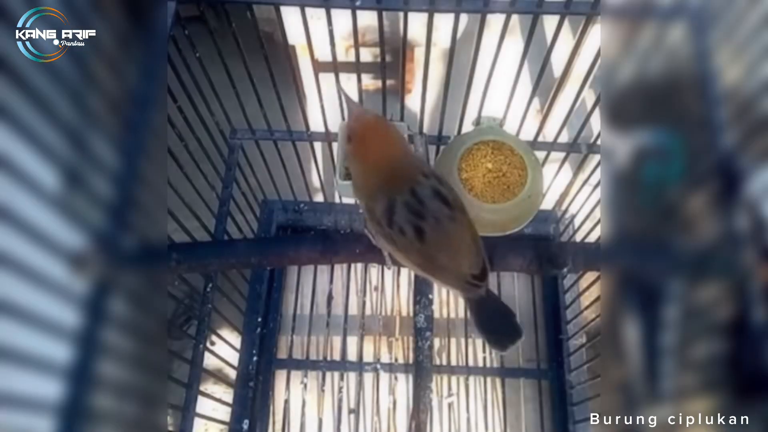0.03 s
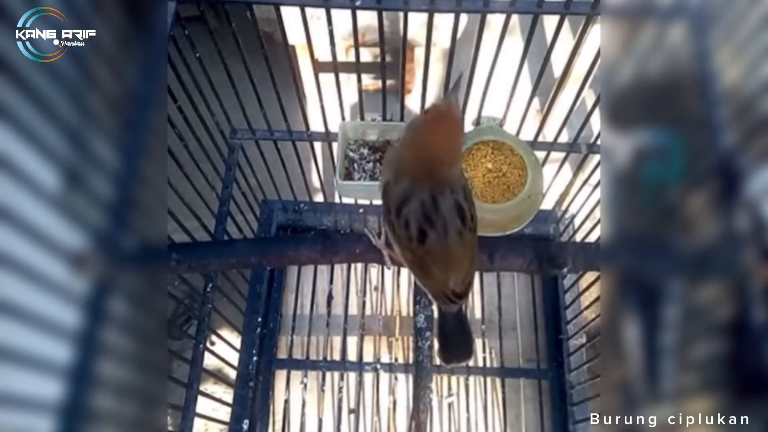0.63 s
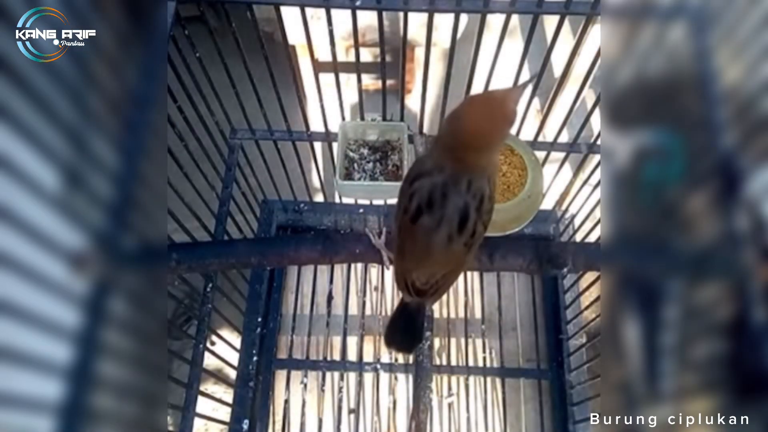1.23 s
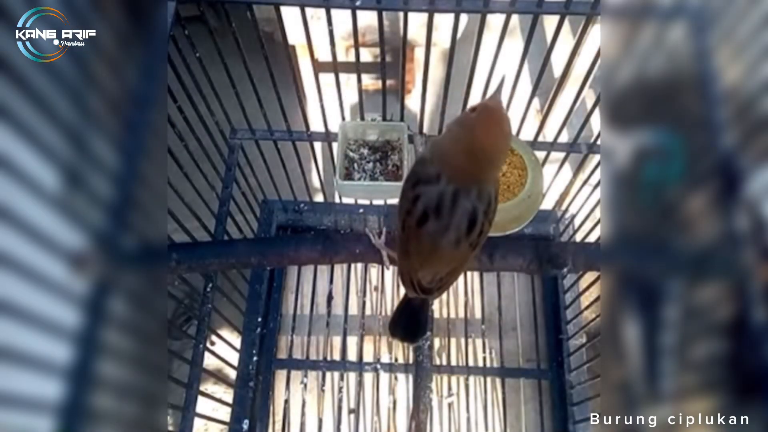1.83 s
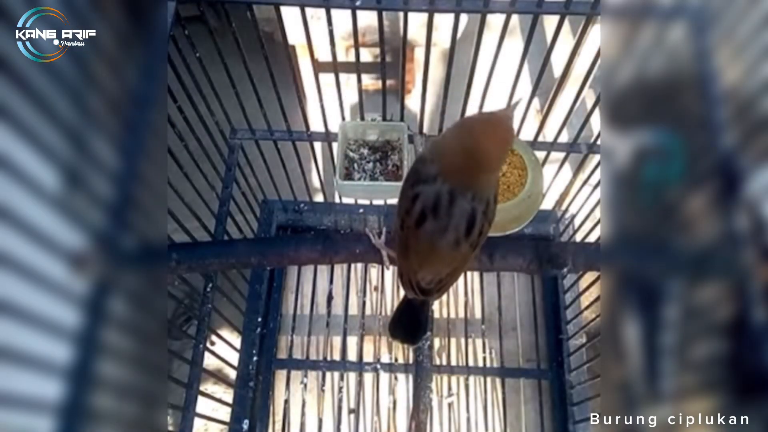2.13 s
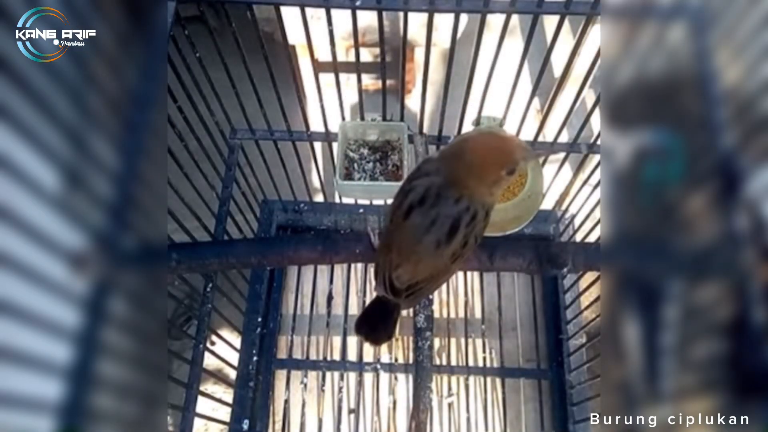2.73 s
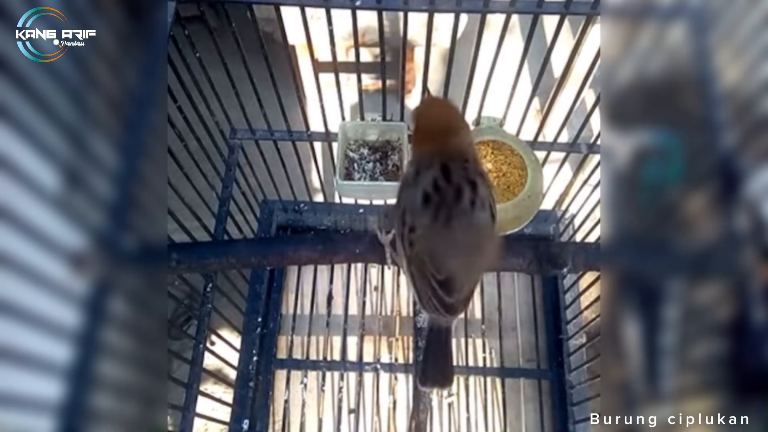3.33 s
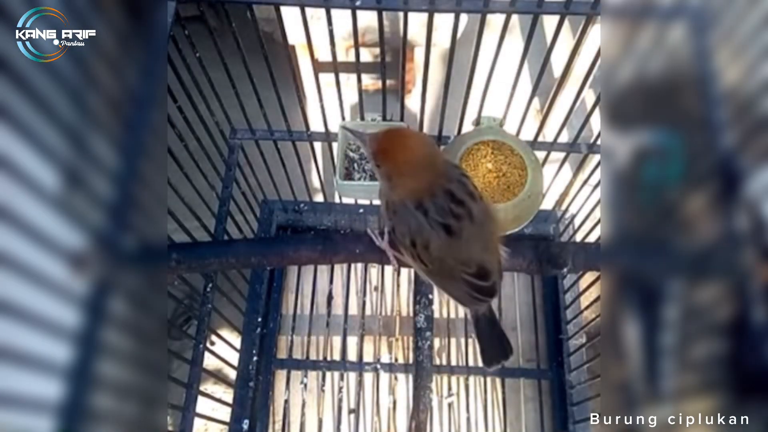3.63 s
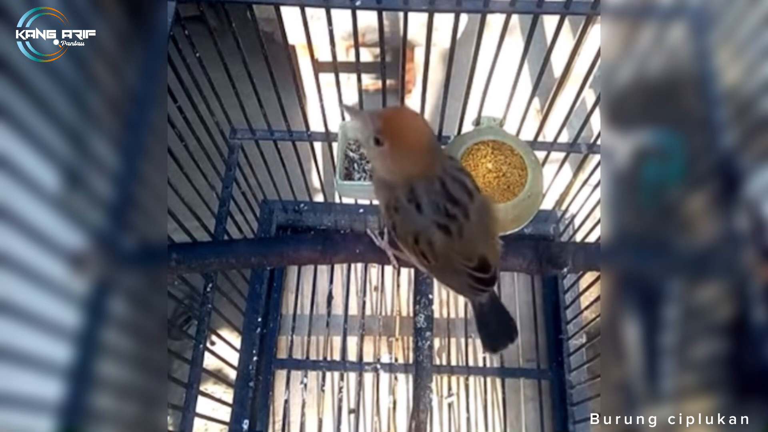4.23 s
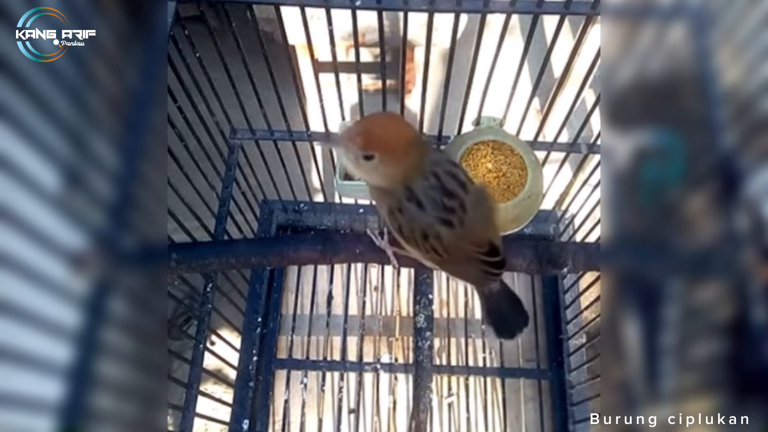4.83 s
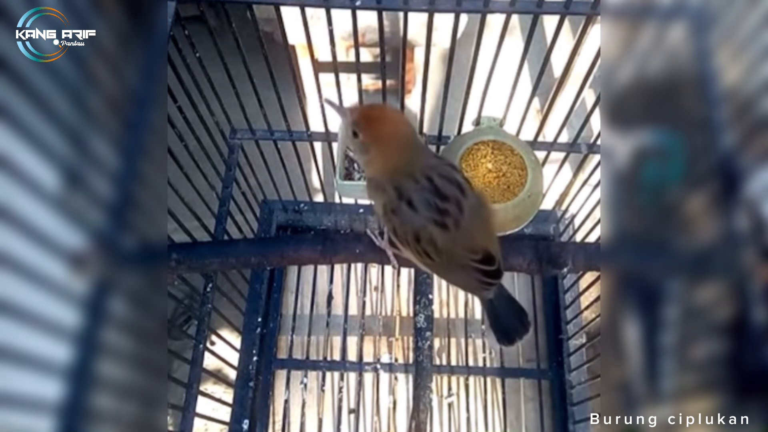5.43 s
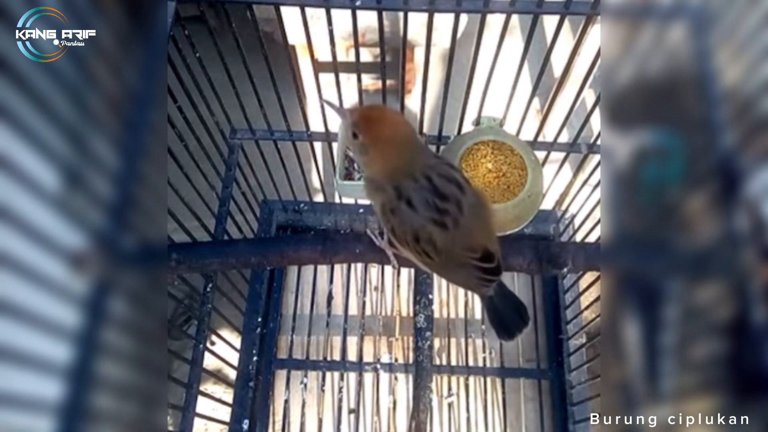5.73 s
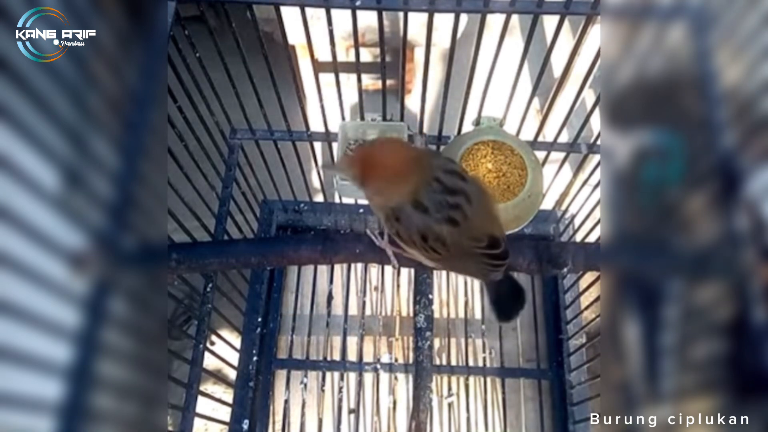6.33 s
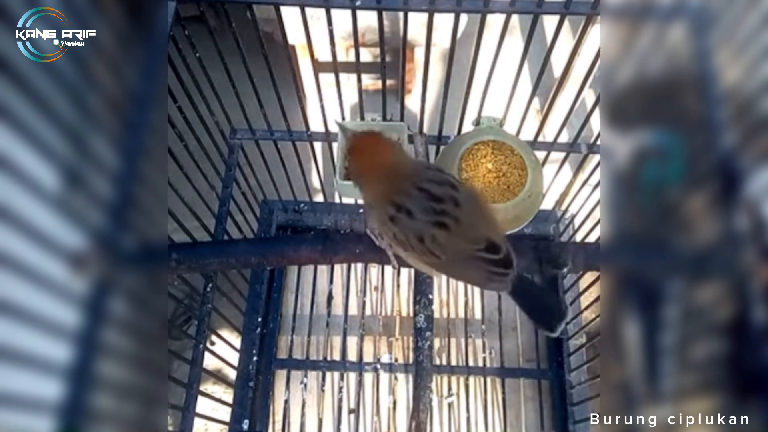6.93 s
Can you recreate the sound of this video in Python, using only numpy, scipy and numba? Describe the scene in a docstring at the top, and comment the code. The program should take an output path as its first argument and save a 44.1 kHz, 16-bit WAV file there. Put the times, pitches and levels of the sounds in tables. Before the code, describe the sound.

Close by, a small songbird chirps sharply in two bursts, hops once, then whines and rasps against a low, steady indoor hum.

```python
"""A caged songbird

Close by, the syrinx of a small bird sounds two runs of loud up-slurred chirps, soft peeps and low churrs.
Its pulses, filtered by throat and beak, give a harsh buzz and nasal whines that break into a rasp.
The bird hops round once on its perch, and its wire cage adds brief reflections. Fainter whistles come
from further off; a short room tail and a steady rumble, motor hum and hiss lie behind."""
import sys
import numpy as np
from scipy import signal
from scipy.fft import rfft, irfft, next_fast_len
from scipy.io import wavfile
from scipy.ndimage import uniform_filter1d, minimum_filter1d
from numba import njit

SR = 44100
rng = np.random.default_rng(int(sys.argv[2]) if len(sys.argv) > 2 else 0)


def master(y):
    """Save y as 16-bit WAV."""
    cut = np.clip(np.atleast_2d(y).T, -1, 1)
    pcm = np.round(cut * 32767)  # scale
    wavfile.write(sys.argv[1], SR, pcm.astype(np.int16))


N = 307818
T = np.arange(N) / SR

# Chirps: start t/s, lock into a tone t/s, end t/s, last puff f/Hz, crest f/Hz, end f/Hz,
# stutter level/dB, tone level/dB, fade of the tone/dB, warble strength (0-1)
CHIRPS = [(0.073, 0.109, .178, 2483, 3362, 3052, -18, -11.5, 9, .2),
          (0.348, 0.38, .446, 2900, 3540, 3240, -12, -9.5, 8, 0.66),
          (.616, .649, .711, 3067, 3642, 3280, -10.5, -10, 2, 0.1),
          (0.896, 0.93, .99, 3386, 3727, 3513, -12, -7, 7.5, 0.93),
          (1.131, 1.168, 1.229, 3403, 3813, 3490, -6.5, -9, 6, .1),
          (3.905, 3.938, 4.011, 2500, 3164, 3290, -13.5, -12, 7, .4),
          (4.173, 4.206, 4.274, 2910, 3708, 3285, -12, -8, 9.5, 0.24),
          (4.413, 4.44, 4.495, 3120, 3647, 3590, -14.5, -11, 18.5, 0.97),
          (4.632, 4.667, 4.731, 3294, 3630, 3407, -16, -14, 7.5, .2),
          (4.876, 4.911, 4.975, 3204, 3782, 3370, -10, -9.5, 11, 0.65),
          (5.108, 5.137, 5.211, 3180, 3686, 3214, -10, -13.5, 4, 0.2),
          (5.364, 5.398, 5.464, 3180, 3723, 3390, -12, -6.5, 21.5, 0.56)]
# Partials of a chirp: multiple of the loud line (the second harmonic of the syrinx), relative level/dB
CHIRP_PARTIALS = [(.5, -35.5), (1, 0.5), (1.5, -34.5), (2, -33.5), (2.5, -47), (3, -37), (3.5, -55.5),
                  (4, -43.5)]
# Spectrum of air rushing through the beak: f/Hz, relative level/dB
BREATH_SPECTRUM = [(700, -26.5), (1600, 1.5), (4000, -2), (7000, -2), (10000, 1), (13000, -2),
                   (15500, -4.5)]


def chirps(first_hz=1880, first_db=-28, puff_s=.0074, sag_db=18, bright_db=8, crest_at=.3,
           warble_hz=84.9, warble_depth=.02, warble_db=2, side_gap_hz=800):
    """Self-sustained oscillation: the syrinx stutters upward in puffs, then locks into an arched tone."""
    out = np.zeros(N)
    for start, lock, end, last_hz, crest_hz, end_hz, last_db, level_db, fade_db, warble in CHIRPS:
        t = span(start, end)
        rising = t < lock
        climb = (t - t[0]) / (lock - t[0])
        held = np.clip((t - lock) / (end - lock), 0, 1)
        puffs = max(round((lock - start) / puff_s), 2)
        puff, age = np.divmod(climb * puffs, 1)
        stair_hz = first_hz + (last_hz - first_hz) * (puff / (puffs - 1)) ** .85
        arch_hz = np.interp(held, [0, crest_at, 1], [.94 * crest_hz, crest_hz, end_hz])
        near_crest = np.exp(-((held - crest_at) / .44) ** 2)
        shake = warble * near_crest * np.sin(2 * np.pi * warble_hz * t + wander(t, 40))
        hz = uniform_filter1d(np.where(rising, stair_hz, arch_hz * (1 + warble_depth * shake)), size=25)
        waver = np.where(rising, .02, .0075) * wander(t, 350) + .006 * wander(t, 90)
        phase = phase_of(hz * (1 + waver))
        # early puffs die away before the next one; later ones merge
        stutter_db = np.interp(climb, [0, .66, 1], [first_db, last_db - 2.5, last_db])
        stutter_db -= sag_db * (age - .5) * (1 - puff / puffs)
        tone_db = level_db - fade_db * held ** 1.54 + warble_db * shake + gate_db(t, 1 / SR, .0045)
        db = np.where(rising, stutter_db, tone_db) + 1.4 * wander(t, 130)
        # the membranes beat unevenly, most of all before they lock
        unrest = np.where(rising, .055, .01)
        phase += unrest * wander(t, 2200)
        envelope = uniform_filter1d(undb(db), size=40) * (1 + unrest * wander(t, 2200))
        voice = noise(BREATH_SPECTRUM, len(t)) * undb(np.where(rising, -34, -42))
        for k, partial_db in CHIRP_PARTIALS:
            flicker_db = 4 * (k != 1) * wander(t, 129.4)
            voice += undb(partial_db + rising * bright_db * (k > 1) + flicker_db) * np.sin(k * phase)
        # a weak second voice comes and goes just under the locked tone
        side = undb(-28 + 6 * wander(t, 37)) * np.sin(phase - 2 * np.pi * side_gap_hz * t)
        voice += side * uniform_filter1d(1. - rising, size=201)
        add(out, t, envelope * np.sqrt(2) * voice, fade_s=.0025)
    return out


# Pulse rate of the buzz: t/s, f/Hz
BUZZ_PITCH = [(3.547, 649), (3.585, 700), (3.599, 778), (3.671, 778), (3.741, 769), (3.765, 721),
              (3.775, 690)]


def buzz(crack_s=3.621, crack_width_s=.021, crack_dip_db=6.5):
    """Formant filtering: a nasal pulse train clears as it goes, but cracks once, rough, dull and weak."""
    times, pitch = np.transpose(BUZZ_PITCH)
    t = span(times[0], times[-1])
    crack = np.exp(-((t - crack_s) / crack_width_s) ** 2)
    db = ramp(t, -11, -15) - crack_dip_db * crack + gate_db(t, attack_s=.015, release_s=.014)
    rough = ramp(t, .12, .02) + .6 * crack
    throat_hz = ramp(t, 5250, 4600) * (1 - .29 * crack)
    return pulsed_voice(t, np.interp(t, times, pitch), db, rough, throat_hz, upper_ratio=1.33,
                        widths_hz=(1490, 1600), upper_db=-.5, broad_db=-14, air_db=-23, direct_db=-30)


# Lower throat resonance in the rasp: t/s, f/Hz
RASP_FORMANT = [(6.81, 4000), (6.83, 3260), (6.854, 2880), (6.888, 2840), (6.945, 3940), (6.98, 4100)]


def rasp(pulse_hz=823):
    """A moving formant: the throat narrows, then opens on a hoarse scream, letting more treble out."""
    times, formant = np.transpose(RASP_FORMANT)
    t = span(times[0], times[-1])
    throat_hz = np.interp(t, times, formant)
    closed = (throat_hz.max() - throat_hz) / np.ptp(throat_hz)
    hz = pulse_hz * (1 + .033 * wander(t, 40))
    db = -16 + gate_db(t, attack_s=.018, release_s=1 / SR)
    rough = np.full(len(t), .8)
    out = pulsed_voice(t, hz, db, rough, throat_hz, upper_ratio=1.384, widths_hz=(1120, 2320),
                       upper_db=-2.5 - 7.5 * closed, broad_db=-16.5, air_db=-3,
                       direct_db=-30 - 9 * closed, broad_hz=1950)
    hiss = noise([(7000, -15), (10000, -11), (14000, -3)], len(t))
    add(out, t, undb(-31 - 24 * closed) * hiss)
    return out


def creak(start_s=6.694, end_s=6.717):
    """Aperiodic vibration: the first whine ends in pulses that slow and roughen as the throat closes."""
    t = span(start_s, end_s)
    db = -16 + gate_db(t, attack_s=.013, release_s=.013)
    return pulsed_voice(t, hz=ramp(t, 494, 310), db=db, rough=ramp(t, .55, .84),
                        throat_hz=ramp(t, 4100, 2700), upper_ratio=1.7, widths_hz=(1200, 1800),
                        upper_db=-4, broad_db=-5, air_db=-16, direct_db=-42)


def pulsed_voice(t, hz, db, rough, throat_hz, upper_ratio, widths_hz, upper_db, broad_db, air_db,
                 direct_db, broad_hz=2550, jitter=.12, shimmer_db=3):
    """Source and filter: uneven syrinx pulses and rushing air ring two resonances of throat and beak."""
    cycles = np.cumsum(hz) / SR
    k = np.arange(1, int(cycles[-1]))
    unrest = np.interp(k, cycles, rough)
    timing, strength = rng.standard_normal((512, 2))[:len(k)].T
    # the two sides of the syrinx beat once in four cycles
    late = jitter * unrest * (timing + 2 * np.sin(np.pi * k / 2))
    centres = np.interp(k + late, cycles, np.arange(len(t)))
    # band-limited pulses can fall between samples
    taps = np.round(centres).astype(int)[:, None] + np.arange(-8, 9)
    clicks = undb(shimmer_db * unrest * strength)[:, None] * np.sinc(taps - centres[:, None])
    pulses = np.bincount(np.clip(taps, 0, len(t) - 1).ravel(), clicks.ravel(), len(t))
    drive = unit(pulses) + undb(air_db) * rough * rng.standard_normal(len(t))
    lower = resonance(drive, throat_hz, widths_hz[0])
    upper = undb(upper_db) * resonance(drive, upper_ratio * throat_hz, widths_hz[1])
    # a weak broad resonance carries the low harmonics
    broad = undb(broad_db) * resonance(drive, np.full(len(t), float(broad_hz)), width_hz=1700)
    voice = lower - upper + broad + undb(direct_db) * drive
    running_rms = np.sqrt(np.abs(uniform_filter1d(voice ** 2, size=500)) + 1e-12)
    out = np.zeros(N)
    add(out, t, undb(db) * voice / running_rms)
    return out


# Pitch contours, one list for each whine: t/s, f/Hz
WHINE_PITCHES = [
    [(6.47, 1090), (6.488, 1122), (6.502, 1032), (6.52, 1243), (6.544, 1323), (6.598, 1221), (6.614, 1145),
     (6.682, 1061), (6.71, 997)],
    [(6.772, 900), (6.788, 1056), (6.814, 1038), (6.832, 907)],
]
# Response of throat and beak in a whine: f/Hz, gain/dB
THROAT_RESPONSE = [(1100, -25), (2300, -11), (3700, -1), (4900, 2), (6600, 1.5), (7600, -12.5),
                   (9000, -22.5), (12000, -23)]


def whines(odd_db=(-6.5, -15.5), air_db=-25):
    """A harmonic series glides through the throat's response, swelling as its odd members sink."""
    out = np.zeros(N)
    k = np.arange(1, 11)[:, None]
    for contour in WHINE_PITCHES:
        times, pitch = np.transpose(contour)
        t = span(times[0], times[-1])
        hz = np.interp(t, times, pitch)
        phase = phase_of(hz * (1 + .003 * wander(t, 500)))
        flicker_db = 1.5 * np.array([wander(t, 90) for _ in k])
        gains = gain_at(THROAT_RESPONSE, k * hz) * undb(ramp(t, *odd_db) * (k % 2) + flicker_db)
        voice = np.sum(gains * np.sin(k * phase), axis=0) / np.sqrt(np.sum(gains ** 2, axis=0) / 2)
        db = ramp(t, -23, -19.5) + gate_db(t, attack_s=.018, release_s=.013) + 2.5 * wander(t, 142)
        breath = undb(air_db) * noise(THROAT_RESPONSE, len(t))
        add(out, t, undb(db) * (voice + breath))
    return out


# Peeps: start t/s, end t/s, crest f/Hz, level/dB
PEEPS = [(0.05, 0.117, 3740, -32.5), (3.529, 3.573, 2950, -38), (3.965, 4.039, 3830, -32.5),
         (4.461, 4.497, 3950, -30), (4.597, 4.662, 3786, -29), (4.982, 5.064, 3750, -28.5),
         (5.275, 5.351, 3826, -24.5), (5.727, 5.806, 3787, -26.5), (6.661, 6.715, 3780, -22.5)]


def peeps():
    """Nearly sinusoidal oscillation: soft clear notes arch in pitch."""
    out = np.zeros(N)
    for start, end, hz, db in PEEPS:
        t = span(start, end)
        note = slur(t, hz, glide_oct=0, bow_oct=.13, waver=.004, flutter_db=2, octave_db=-29, taper_db=6)
        add(out, t, undb(db) * note)
    return out


# Churrs: start t/s, end t/s, middle f/Hz, level/dB
CHURRS = [(0.446, 0.498, 1990, -36), (.538, 0.57, 1750, -33.5), (0.553, 0.599, 2160, -28.5),
          (0.631, .69, 1780, -31), (0.739, 0.797, 1860, -33.5)]


def churrs():
    """Random frequency modulation makes low notes hoarse as they rise and level off."""
    out = np.zeros(N)
    for start, end, hz, db in CHURRS:
        t = span(start, end)
        note = slur(t, hz, glide_oct=.25, bow_oct=.15, waver=.072, flutter_db=3.5, octave_db=-28)
        add(out, t, undb(db) * note)
    return out


def slur(t, middle_hz, glide_oct, bow_oct, waver, flutter_db, octave_db, taper_db=4):
    """Frequency and amplitude modulation: a tone and its weak octave glide, bow over, swell and fade."""
    progress = ramp(t, 0, .99)
    off_centre = (2 * progress - 1) ** 2
    hz = middle_hz * 2 ** (glide_oct * (progress - .5) - bow_oct * off_centre)
    phase = phase_of(hz * (1 + waver * wander(t, 600)))
    swell = np.sqrt(np.sin(np.pi * progress)) * undb(flutter_db * wander(t, 300) - taper_db * off_centre)
    return unit(swell * (np.sin(phase) + undb(octave_db) * np.sin(2 * phase)))


# Wing beats and claws on the perch: t/s, initial level/dB
FLICKS = [(3.128, -57), (3.158, -49), (3.176, -49), (3.191, -45.5), (3.222, -62), (5.88, -55)]


def hop(decay_s=.0099):
    """Damped transients: feathers and claws give dry bursts of noise that decay exponentially."""
    out = np.zeros(N)
    for start, db in FLICKS:
        t = span(start, start + .04)
        flick = noise([(300, -14), (2000, -3), (6500, 2), (9000, -7), (15000, -20)], len(t))
        add(out, t, undb(db) * np.exp(-(t - start) / decay_s) * flick)
    return out


# Distant whistles: start t/s, end t/s, middle f/Hz, glide/octaves, source level/dB
WHISTLES = [(0.802, 0.867, 4300, 0.47, -40), (0.849, .895, 5320, .36, -33.5),
            (1.183, 1.273, 5270, -0.48, -32), (1.68, 1.78, 4950, .1, -56.5),
            (2.139, 2.229, 5130, -0.64, -52), (2.53, 2.649, 4860, 0.24, -56), (3.069, 3.17, 5000, -.7, -54),
            (4.028, 4.106, 5020, -.57, -51.5), (4.146, 4.26, 5400, 0.3, -41.5),
            (6.25, 6.382, 4930, 0.23, -58.5)]


def whistles():
    """Frequency sweeps: thin far-off tones slur, some up and some down."""
    out = np.zeros(N)
    for start, end, hz, glide_oct, db in WHISTLES:
        t = span(start, end)
        note = slur(t, hz, glide_oct, bow_oct=.11, waver=.025, flutter_db=3, octave_db=-49)
        add(out, t, undb(db) * note)
    return out


# Spectrum of the rumble: f/Hz, relative level/dB
RUMBLE_SPECTRUM = [(12, -36), (20, -5.5), (81, -0.5), (112, -4.5), (145, -12.5), (202, -12.5), (331, -16.5),
                   (383, -17), (443, -19), (640, -21), (688, -23.5), (906, -24), (1600, -26.5), (2080, -61),
                   (3520, -120)]
# Spectrum of the hiss: f/Hz, relative level/dB
HISS_SPECTRUM = [(1300, -19), (1750, 4), (3100, 0.5), (5000, -1), (6600, -0.5), (7600, -11.5), (9000, -15),
                 (13500, -19.5), (14800, -6.5), (16000, -4)]
# Partials of a faint motor hum: f/Hz, level/dB
HUM_PARTIALS = [(77, -54), (99, -58), (150, -57.5), (200, -59)]


def background(rumble_db=-41, sway_db=.77, hiss_db=-52):
    """Continuous and line spectra add: a swaying rumble, smooth hiss and a wavering motor hum."""
    hum = sum(undb(db) * np.sqrt(2) * np.sin(2 * np.pi * hz * T + 1.6 * wander(T, 6))
              for hz, db in HUM_PARTIALS)
    rumble = noise(RUMBLE_SPECTRUM, N) * undb(rumble_db - sway_db * wander(T, 3))
    return rumble + hum + noise(HISS_SPECTRUM, N) * undb(hiss_db)


def undb(db):
    """Amplitude ratio of a level in decibels."""
    return 10 ** (np.asarray(db) / 20)


def unit(x):
    """Normalisation to an rms of one."""
    return x / np.sqrt(np.mean(x ** 2) + 1e-18)


def phase_of(hz):
    """Phase is the time integral of frequency."""
    return 2 * np.pi * np.cumsum(hz) / SR


def span(start, end):
    """Sample times of a note."""
    return T[int(start * SR):int(end * SR)]


def ramp(t, first, last):
    """Linear change through a note."""
    return np.linspace(first, last, len(t))


def wander(t, rate_hz):
    """Random modulation with a standard deviation near one."""
    return np.interp((t - t[0]) * rate_hz, np.arange(1024), rng.standard_normal(1024)) * np.sqrt(3 / 2)


def gate_db(t, attack_s, release_s, edge_db=-25.5):
    """Envelope of attack, hold and release, in dB relative to the held level."""
    return edge_db * (1 - np.clip(np.minimum((t - t[0]) / attack_s, (t[-1] - t) / release_s), 0, 1))


def add(out, t, x, fade_s=.00084):
    """Superposition: a note joins the mix at its times, with tapered ends."""
    first = int(round(t[0] * SR))
    out[first:first + len(t)] += x * np.clip(np.minimum(t - t[0], t[-1] - t) / fade_s, 0, 1)


def gain_at(points, hz):
    """Gain of a (f/Hz, level/dB) outline, interpolated in log frequency."""
    f, db = np.transpose(points)
    return undb(np.interp(np.log(hz + 1), np.log(f), db))


def filtered(x, points):
    """Linear filtering: the spectrum is multiplied by a (f/Hz, level/dB) outline."""
    size = next_fast_len(len(x), real=True)
    hz = np.arange(size // 2 + 1) * SR / size
    return irfft(rfft(x, size) * gain_at(points, hz), size)[:len(x)]


def noise(points, size):
    """Coloured noise of unit rms with a (f/Hz, level/dB) outline."""
    return unit(filtered(rng.standard_normal(size), points))


@njit
def bandpass(x, hz, width_hz):
    """A damped second-order resonator whose centre moves every sample."""
    y, band_state, low_state = np.empty(len(x)), 0., 0.
    for i in range(len(x)):
        g, damping = np.tan(np.pi * hz[i] / SR), width_hz / hz[i]
        band = (band_state + g * (x[i] - low_state)) / (1 + g * (g + damping))
        band_state = 2 * band - band_state
        low_state += 2 * g * band
        y[i] = damping * band
    return y


def resonance(x, hz, width_hz):
    """Two resonators in cascade deepen the valleys between formants."""
    return bandpass(bandpass(x, hz, float(width_hz)), hz, float(width_hz))


def reverberation(x, t60_s, gap_s):
    """Convolution with dense reflections that decay exponentially."""
    t = T[:SR // 2]
    tail = rng.standard_normal(len(t)) * undb(-60 * t / t60_s) * (t > gap_s)
    return signal.oaconvolve(x, tail / np.linalg.norm(tail))[:N]


# Transmission of the beak: f/Hz, gain/dB
BEAK_RESPONSE = [(750, -0.5), (1200, -2.5), (1900, -1), (6900, 1), (7700, -6), (8700, -9), (10000, -20),
                 (15000, -20.5)]


def scene():
    """Direct and reverberant fields: the cage colours the near bird; far whistles carry more room."""
    voice = chirps() + whines() + peeps() + churrs() + buzz() + creak() + rasp()
    near = filtered(voice, BEAK_RESPONSE) + hop()
    far = whistles()
    cage = undb(-9) * reverberation(near, t60_s=.08, gap_s=.0012)
    room = reverberation(undb(-21.5) * near + undb(-6.5) * far, t60_s=.38, gap_s=.006)
    return (near + undb(-4) * far + cage + room + background())[None]


def record(dry, ceiling=.95, cutoff_hz=15700):
    """Peak limiting eases the gain on the loudest peaks; a steep low-pass cuts the top."""
    gain = minimum_filter1d(ceiling / np.maximum(np.abs(dry), ceiling), size=201)
    limited = dry * uniform_filter1d(gain, size=101)
    return signal.sosfilt(signal.ellip(10, .2, 80, cutoff_hz, fs=SR, output="sos"), limited)


dry = scene()
out = record(dry)
master(out)
```